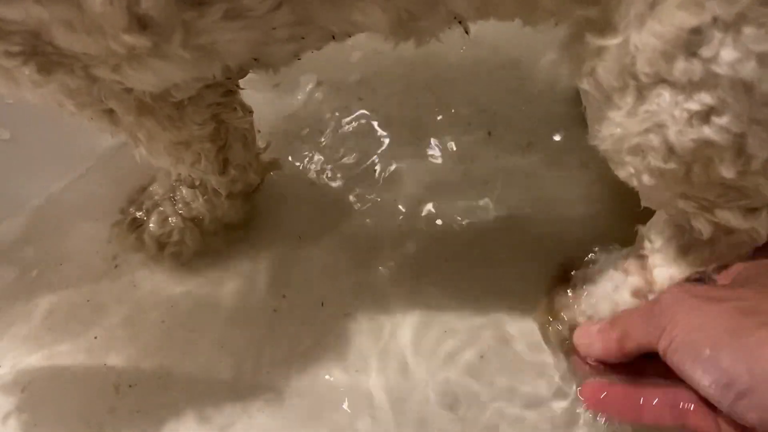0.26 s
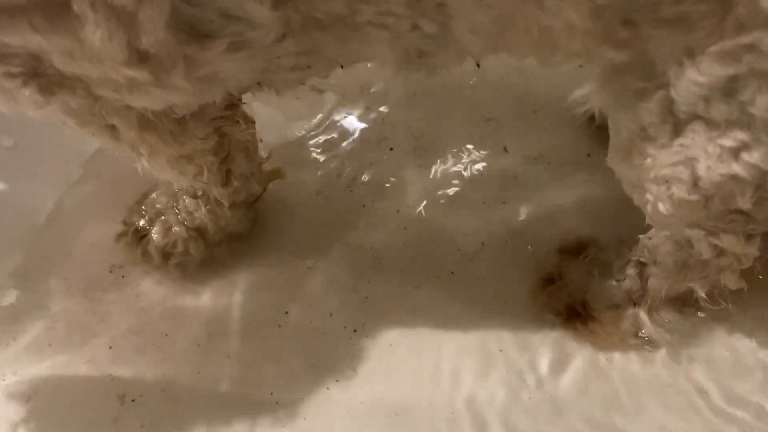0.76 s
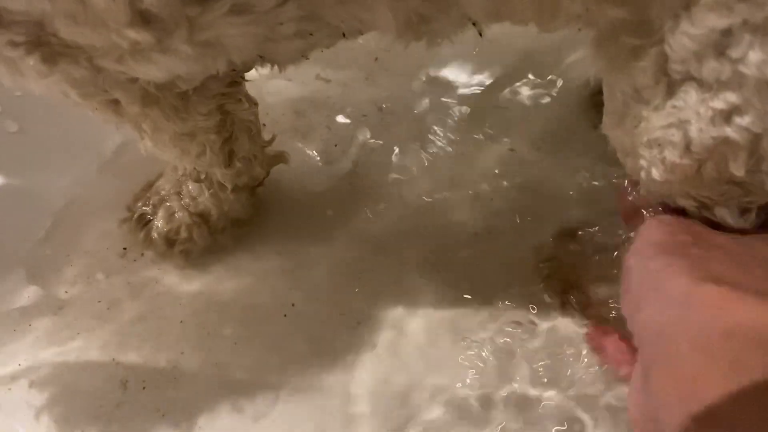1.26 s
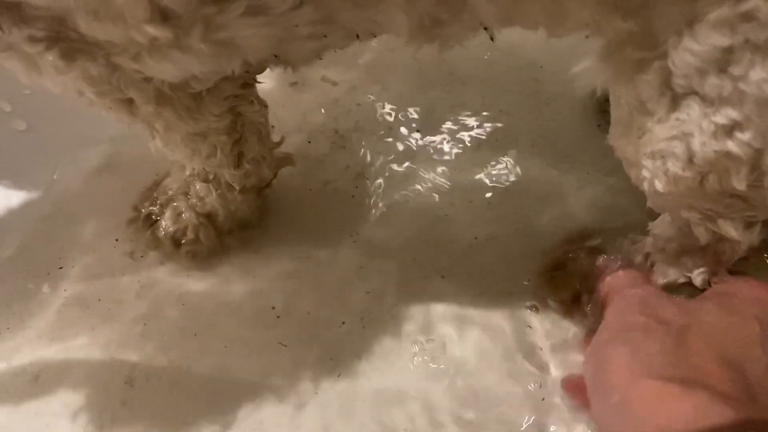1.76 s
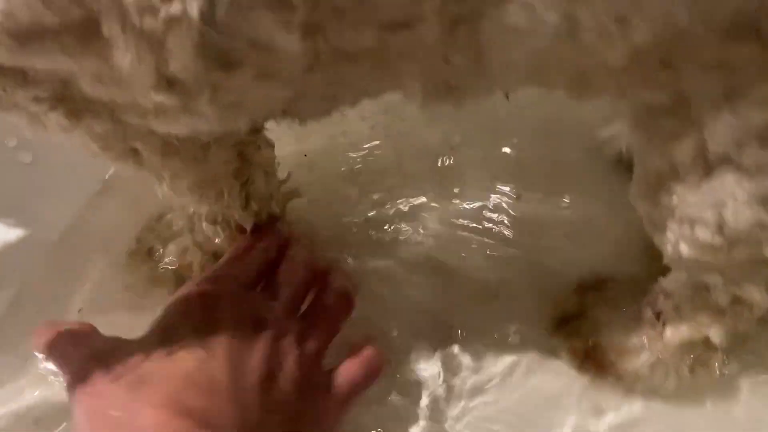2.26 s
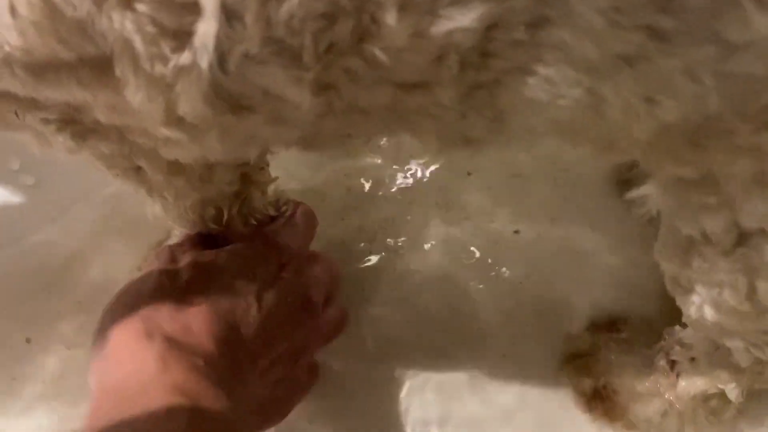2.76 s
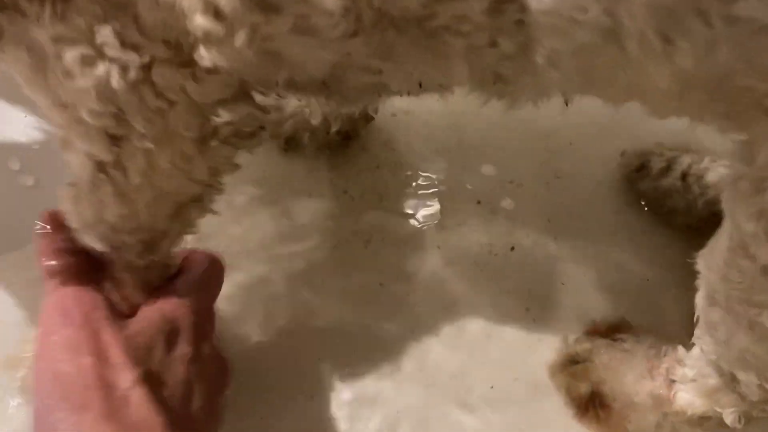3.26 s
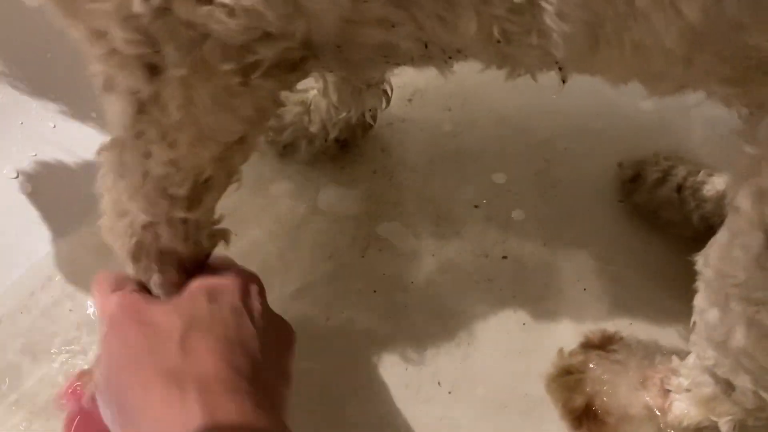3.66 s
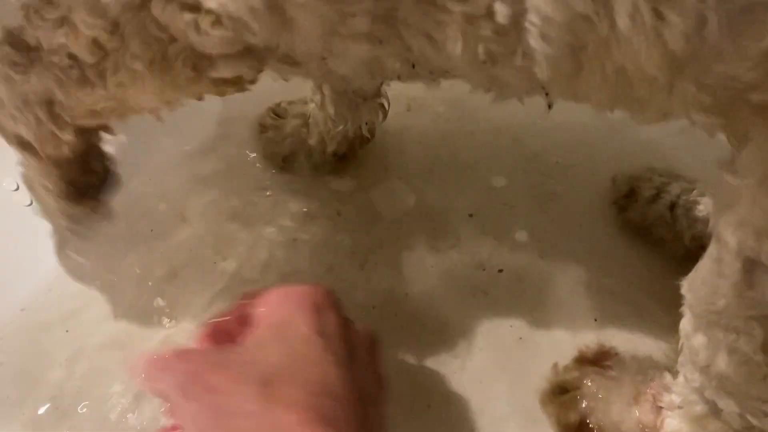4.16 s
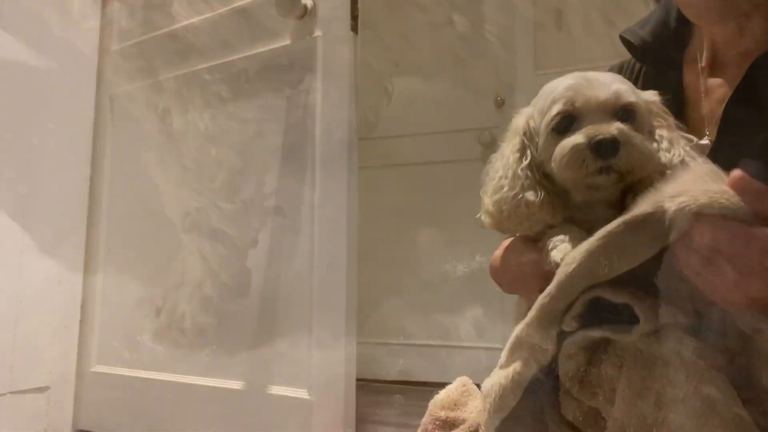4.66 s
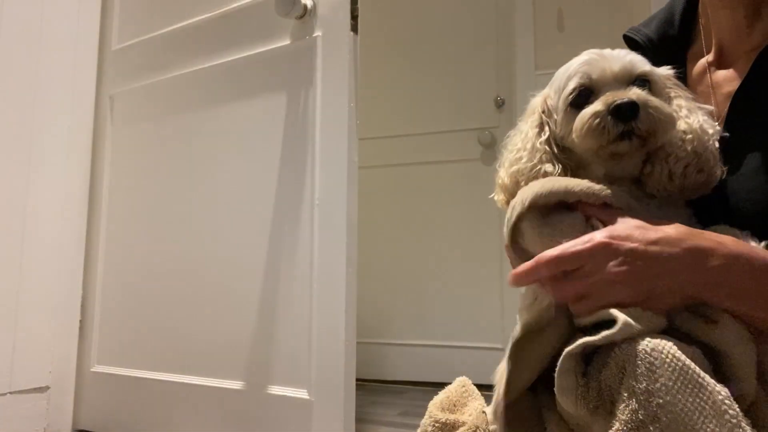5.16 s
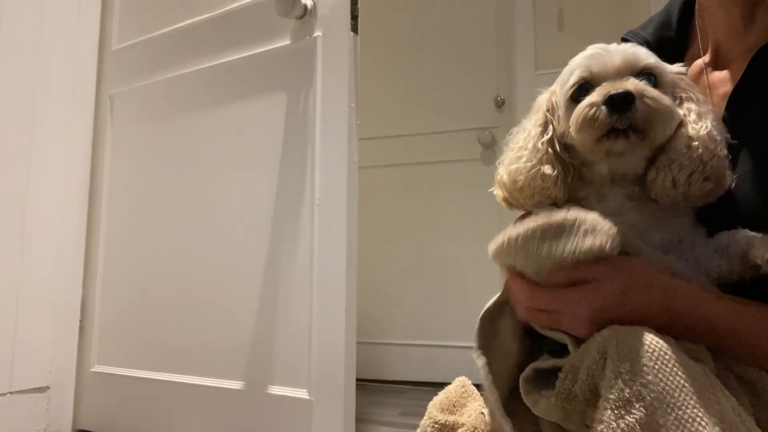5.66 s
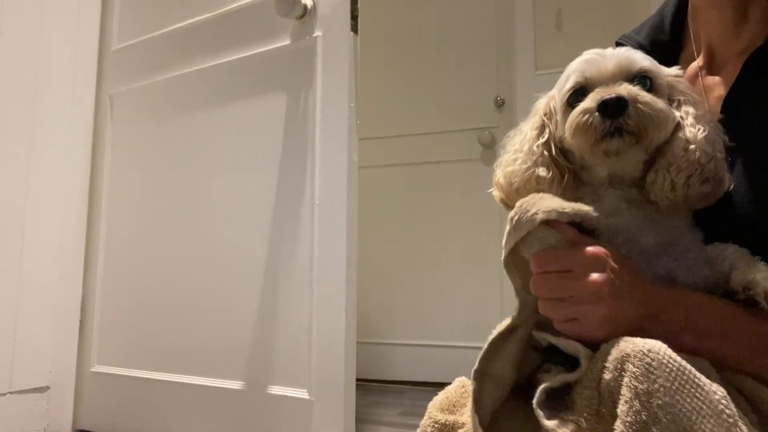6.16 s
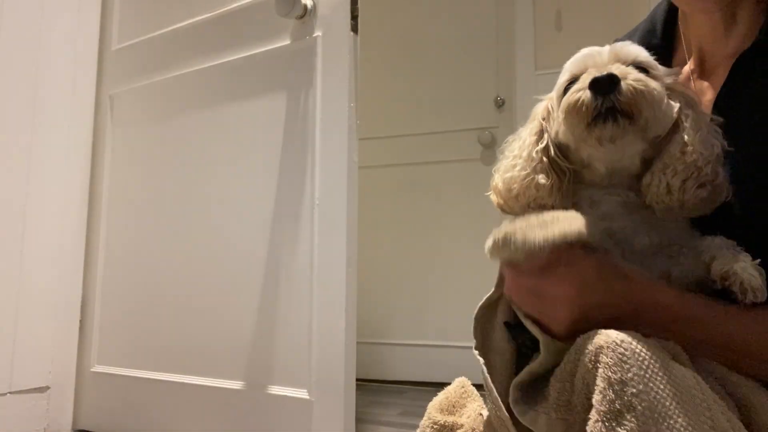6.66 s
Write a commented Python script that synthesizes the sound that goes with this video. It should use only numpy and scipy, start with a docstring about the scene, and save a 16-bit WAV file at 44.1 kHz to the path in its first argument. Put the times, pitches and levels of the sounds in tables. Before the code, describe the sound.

Close, hard-walled tub: a hand washes a small dog's paws in shallow water over a low fan hum. A few drips, then lively splashing with plopping bubbles, a quieter stretch of small trickles and soft wet-fur swishes, then a sharp, bubbly splash. The sound fades into a quieter room, with faint hiss and very soft towel strokes.

```python
"""Paw wash, then towel

A hand washes a small dog's paws in shallow bathwater: air pockets ring as gliding sines, drops tick as
noise bursts, stirred water mixes hiss with crowds of bubbles, and wet fur gives a smooth hiss. The hard tub
throws the water sounds back through a banded noise tail, knocks boom low, and a fan hums as shaped noise.
Then the scene dissolves to a quieter room with a steady faint room and microphone hiss, where strokes of
shaped noise are a towel rustling round the dog.
"""
import sys
import numpy as np
from scipy import signal
from scipy.fft import rfft, irfft, next_fast_len
from scipy.io import wavfile
from scipy.ndimage import uniform_filter1d

SR = 44100
rng = np.random.default_rng(int(sys.argv[2]) if len(sys.argv) > 2 else 0)


def wrap_up_sound(samples):
    """Save the sound to the file named by the first command line argument, as 16-bit audio."""
    columns = np.atleast_2d(samples).T
    # keep every value between -1 and 1, then stretch to whole-number steps
    tamed = np.clip(columns, -1, 1)
    steps = np.round(tamed * 32767).astype(np.int16)
    wavfile.write(sys.argv[1], SR, steps)


N = 305172

# Fan spectrum in each place: (frequency [Hz], density [dB per Hz])
FAN_AT_TUB = [(15, -37.5), (25, -22.5), (65, -2.5), (261, -10.5), (295, -9), (329, -22), (462, -25),
              (496, -11.5), (533, -16.5), (685, -16), (776, -26.5), (864, -18), (1120, -28), (1400, -47),
              (2340, -76.5), (3960, -120)]
FAN_IN_ROOM = [(15, -59), (25, -37.5), (81, 0.5), (207, -10.5), (295, -11), (329, -25.5), (422, -9.5),
               (462, -19.5), (543, -8), (626, -18), (723, -12.5), (1020, -26), (1400, -49), (2340, -64.5),
               (3960, -120)]
# Room modes that colour the fan: (frequency [Hz], width [Hz], lift [dB])
MODES_AT_TUB = [(37, 6.5, 4.5), (62.4, 10, 1.5), (129.5, 20, 8.5), (148.9, 9.8, -10.5), (170, 12, 9),
                (226, 9.7, 4), (297.66, 8.1, 20), (373.7, 57, 13), (420, 16, 13), (526.5, 3.7, 3.5),
                (700, 16, 4.5), (910, 7.9, -2.6)]
MODES_IN_ROOM = [(37, 8, 6.5), (80.9, 20, 2), (181, 16, 2.5), (292, 7.1, 4.7), (432, 11, 6.3),
                 (552, 8.9, 3.6), (685, 12, 16), (757, 11, 4.6), (856, 28, 6.3)]
# Likeness of the two microphone ports, limited when used: (frequency [Hz], likeness [0-1])
SAME_AT_TUB = [(60, 1.9), (250, 0.62), (420, 0), (700, 0.38), (1400, .5), (3000, 0), (6000, 0.04),
               (8500, 0.94), (16000, 0.7)]
SAME_IN_ROOM = [(60, .94), (150, 0.91), (330, 0.18), (650, 0.4), (1400, .2), (3000, 0.14), (6000, 0.19),
                (9000, 1), (16000, .97)]
# Phase by which the left port leads: (frequency [Hz], lead [radians])
LEAD_AT_TUB = [(400, 0), (520, -1), (690, -1.8), (950, -3), (1300, -5.2), (2000, -6.3), (7000, -5.8),
               (8800, -3.14), (11050, 0), (13400, 3.14), (15800, 6.2)]
LEAD_IN_ROOM = [(300, 0), (600, -1.7), (3450, 0), (6550, -.5), (9600, -3.14), (11200, -5.6), (15200, -9.42),
                (16600, -12)]
# Balance of the fan between the ports: (frequency [Hz], left over right [dB])
SIDE_AT_TUB = [(60, -3), (150, 2.5), (380, 1.5), (950, -1), (2380, 6), (5980, 0), (15000, 1)]
SIDE_IN_ROOM = [(60, -4), (150, 2), (380, -0.5), (950, -2), (2380, -4), (5980, 3), (15000, 0.0)]
# Decay time of the tub's tail: (frequency [Hz], time to fall 60 dB [s])
TUB_T60 = [(800, 0.25), (2500, 0.41), (7000, 0.08), (14000, 0.26)]
# Early echoes off the tub walls: (delay [ms], level over the tail's taps before decay [dB])
TUB_ECHOES = [(3.1, 8), (7.5, 11), (14, 14), (21, 7.5)]
# Tone at the microphone held over the tub: (frequency [Hz], level [dB])
TUB_COLOUR = [(7000, 0.5), (9000, 3.5), (11000, 1.5), (13000, -9.5), (14800, -14.5), (16000, -15.5)]
# Paws and hand knock the tub: (time [s], level [dB], pitch [Hz])
THUMPS = [(.02, -34, 63), (1.061, -34, 61), (1.699, -35, 64.5), (4.642, -32.5, 60.6), (4.645, -36, 180)]
# Tone of the room's steady faint hiss, shared by the light towel strokes:
# (frequency [Hz], density [dB per Hz])
RUSTLE = [(900, -27), (1400, -9), (2050, -10.5), (2500, -4.5), (3000, -12.5), (4100, -7), (5000, -1),
          (5800, -5), (8300, -8), (9500, -15), (11000, -42)]
# Towel strokes: (start [s], rise [s], hold [s], level [dB], fine top level [dB])
TOWEL = [(5.002, 0.017, .01, -69, -77), (5.253, 0.055, 0.12, -75, -80.5),
         (5.453, 0.026, 0.12, -72.5, -91.5), (5.607, 0.059, 0.037, -69.5, -83),
         (5.82, 0.07, 0.11, -76, -93.5), (5.949, 0.13, 0.021, -71.5, -78), (6.17, 0.0099, 0.093, -77, -85),
         (6.435, 0.052, 0.038, -60, -72.5), (6.577, 0.034, 0.046, -70.5, -76),
         (6.719, 0.041, 0.0037, -67.5, -90)]
# Tone of a firm rub: (frequency [Hz], density [dB per Hz])
STROKE = [(900, -12), (1500, -8), (2500, -1), (4000, -5), (6000, -2.5), (8300, -1.5), (9500, -10),
          (11000, -38)]
# The hand slides along wet fur: (start [s], rise [s], hold [s], level [dB], brightness [0-1])
SWISH = [(2.574, 0.024, .04, -59.5, .1), (2.637, 0.01, 0.014, -53.5, 0.36), (2.78, 0.13, 0.034, -59.5, 0),
         (2.995, 0.078, 0.039, -61, 0.55), (3.103, 0.0073, 0.0081, -60, 1), (3.28, 0.0086, 0.0079, -79, .9),
         (3.947, 0.096, 0.16, -67, 0)]
# Surges of stirred water:
# (start [s], rise [s], hold [s], body level [dB], spray level [dB], share that gurgles [0-1])
SLOSH = [(0, 0.01, 0.25, -71, -73.5, 0.2), (0.297, 0.028, 0.15, -78.5, -77, 0),
         (0.495, .03, 0.081, -72.5, -64.5, 0.2), (.625, 0.0075, 0.025, -54, -44, 0.75),
         (0.677, 0.013, 0.15, -42, -61, 0.28), (0.879, 0.0057, 0.01, -45, -40.5, 0.4),
         (0.911, 0.019, 0.12, -43.5, -55.5, 0.71), (1.124, 0.011, 0.06, -60, -60, .5),
         (1.185, 0.0092, 0.023, -53, -46.5, .1), (1.326, 0.011, 0.078, -82, -65, 0.4),
         (1.42, 0.02, 0.44, -80, -68.5, 0.18), (1.727, .008, .04, -90, -70, 0.08),
         (1.922, 0.089, 0.078, -60.5, -67.5, 0.44), (2.128, .01, .01, -62, -64, .2),
         (2.186, 0.061, 0.26, -73, -78, 0.4), (3.276, 0.036, 0.18, -85, -78, 0.43),
         (3.555, 0.0097, .01, -70, -63, .6), (3.577, 0.031, 0.016, -54.5, -72, 0.05),
         (3.681, .008, 0.0081, -61, -66, 0.3), (3.807, 0.02, 0.049, -82, -73, 0.6),
         (3.904, .008, 0.0074, -69, -71.5, 0.5), (3.943, .03, 0.026, -68, -90, 0.45),
         (4.315, 0.022, 0.038, -68, -60, .6), (4.365, 0.03, .01, -49.5, -65, 0.4),
         (4.43, 0.0039, 0.013, -33.5, -45.5, 0.06), (4.538, 0.05, 0.033, -47, -43, 0.9),
         (4.595, 0.0042, .04, -40, -41, 0), (4.647, 0.019, 0.092, -40.5, -45, 0.5),
         (4.777, 0.012, 0.17, -52, -57.5, 0.5)]
# Tone of the water's body and of its spray: (frequency [Hz], density [dB per Hz])
BODY = [(240, -30), (400, -1), (467, -13), (646, -8), (1830, -5.5), (3180, -12.5), (4280, -17),
        (7000, -15.5), (9100, -49), (15400, -120)]
SPRAY = [(2500, -14), (4500, 0), (7000, -5), (10000, -6.5), (16000, -5)]
# Drops, bursting films and small snaps: (time [s], level [dB], dull body against the treble [dB])
TICKS = [(0.0364, -33.5, -10), (0.1025, -48, -10), (.111, -44.5, 1), (.2435, -55, 8), (0.2622, -45, -34),
         (.405, -56, -24), (.5462, -53, -20), (0.567, -50, -11), (.586, -45.5, -16), (0.5914, -47, -15),
         (0.6346, -32, -21), (0.6656, -25, 6), (0.6935, -32, -7), (.7183, -30, -2), (0.734, -24, -4),
         (0.752, -20.5, 11), (0.782, -30, -11), (0.8466, -19, 13), (.8637, -19.5, 16), (.8865, -40, -15),
         (.9297, -31, 5), (1.02, -33, 0), (1.0616, -38, -11), (1.124, -29, 1), (1.0414, -47, 5),
         (1.1578, -47, -13), (1.2014, -22.5, -20), (1.304, -41.5, -8), (1.3432, -34, -3.5),
         (1.3728, -50.5, -24), (1.565, -54, -4.5), (1.612, -49.5, -1), (1.6483, -50, -14),
         (1.7307, -45, -20), (1.7506, -43, -15), (1.8766, -50, -22), (1.9485, -53, -9), (2.0009, -62, 2),
         (2.124, -40.5, 8), (2.248, -50, -14), (2.3096, -54, -16), (2.3434, -56, -25), (2.433, -49, -12),
         (2.565, -55, -11), (2.589, -53, -8), (2.6377, -34.5, 24), (2.6632, -43, 9), (3.1163, -46.5, 1),
         (3.565, -39, -8.5), (3.6003, -44, 3), (3.689, -44, 23), (3.7058, -42.5, -9), (3.811, -48.5, -13),
         (3.8347, -55, -23), (4.086, -43, 0), (4.279, -59.5, -12), (4.329, -33, -10), (4.369, -38, 4),
         (4.3936, -30, 3), (4.438, -28.5, -3), (4.5253, -44, -9), (4.5506, -45, -6), (4.569, -34, -3),
         (4.5818, -27, 16), (4.6033, -11.5, 3), (4.723, -28.5, -9), (4.774, -38, -1), (4.795, -32, 12),
         (4.818, -37, 5), (4.8324, -27.5, -4), (4.9507, -47, 0), (4.9654, -32, 6), (5.022, -45, -1),
         (5.0488, -52, -6.5), (5.692, -54, -6.5), (6.185, -59, -11), (6.446, -56, -0.5),
         (6.4867, -51.5, -17), (6.5084, -57, -9.5), (6.765, -59, -4.5)]
# Bubbles that stand out, and a few soft plops in the towel:
# (time [s], level [dB], pitch [Hz], length [ms], rise [octaves], left over right [dB])
BUBBLES = [(0.038, -40.5, 1636, 4.1, -0.0043, 2), (.635, -40, 1464, 12, -.19, 5),
           (.655, -31.5, 1820, 3.6, 0.094, -1.5), (.666, -25.5, 1750, 3.3, -0.22, 0),
           (0.671, -28.5, 5130, 0.86, 0.095, -12), (.68, -35, 1195, 7.9, 0.27, -0.5),
           (.696, -44.5, 2190, 9.4, -.09, -3.5), (.696, -33, 662, 18, 0.28, 3.5),
           (0.697, -30.5, 1434, 14, 0.16, 0), (0.72, -26.5, 5020, 2, 0, -9.5),
           (0.735, -31.5, 2910, 5.4, -0.004, 4), (0.749, -30, 2430, 8.3, 0.032, 6),
           (.765, -26.5, 2830, 3.3, 0.022, 7.5), (.77, -36, 566, 8.7, .36, 3),
           (.778, -30, 2050, 3.7, .06, -5.5), (0.778, -25.5, 987, 9.9, 0.59, 3),
           (.786, -30, 635, 6.8, 0.28, 2), (0.797, -30.5, 1034, 15.4, 0.13, 8.5),
           (.811, -31, 1790, 3.4, .29, -9), (.821, -25.5, 1750, 4.9, 0.19, 2.5),
           (0.837, -35, 3320, 6.5, 0.021, 3), (.847, -35.5, 1800, 3.2, -0.15, 1),
           (.849, -32, 3470, 0.42, 0, -11.5), (.865, -20.5, 1825, 2.8, -0.19, 5.5),
           (0.876, -36, 2740, 10, 0.16, -1.5), (0.886, -43, 1720, 8.1, -0.26, 1.5),
           (.95, -37, 819, 27, 0.94, 0.5), (.95, -42.5, 2230, 12, .1, 14),
           (.986, -37, 795, 2.2, -.14, -1.5), (.988, -38.5, 4800, 2.7, -0.49, -12),
           (1.014, -32.5, 4330, 2.6, 0.034, -5), (1.025, -39.5, 754, 8.7, -0.47, 0.5),
           (1.044, -44, 2790, 5, .1, -5), (1.046, -44, 1760, 10, 0, 5),
           (1.09, -38.5, 1272, 15.5, -0.026, 2.5), (1.113, -44, 3970, 2.4, 0, 0),
           (1.128, -32, 1780, 2.7, 0.35, 1), (1.161, -38, 5000, 1.4, 0, -4),
           (1.204, -40.5, 1170, 6.7, -0.1, 7), (1.343, -48.5, 1770, 3.9, 0.4, 4),
           (1.377, -43.5, 4970, 0.78, -0.18, -11), (1.628, -55, 3600, 4.6, 0.16, 0),
           (1.789, -51, 3650, 4.4, 0.11, -5), (1.842, -41, 3600, 3.2, 0.13, -5),
           (1.953, -59, 3020, 6, .05, -3), (1.987, -47, 1670, 1.5, .24, 2),
           (2.018, -44, 1330, 6.9, 0.14, 2), (2.031, -38, 2080, 4.1, 0.22, 5),
           (2.072, -51, 2490, 7.4, 0.11, -5), (2.123, -52, 2830, 2.1, -0.077, -1),
           (2.144, -39, 2125, 4.5, -0.051, 4), (2.39, -54, 2200, 2, 0, 3), (2.599, -45, 2090, 2.3, .06, 3),
           (2.88, -50, 2630, 2.5, .05, 2), (2.945, -50, 2600, 2.2, 0, 0), (3.175, -54, 2300, 2.7, 0, -1),
           (3.342, -64, 2400, 2, 0, -1), (3.45, -66, 2610, 1.8, 0, 0), (3.485, -65, 2500, 2, -0.12, 2),
           (3.579, -47, 1250, 5.7, -0.45, 3), (3.621, -48, 1290, 10.7, -0.21, 3),
           (3.623, -43, 2070, 4.2, 0.018, 7), (3.63, -45, 2060, 6, -0.19, -2),
           (3.645, -48.5, 3300, 7.1, 0.23, 6), (3.646, -40, 2180, 1.6, 0, 1),
           (3.69, -46, 1560, 5.7, -0.029, 3), (3.723, -51.5, 3900, 2.5, -.11, -1),
           (3.922, -36.5, 2990, 3.5, 0, 5), (3.933, -57.5, 3250, 25, 0, 1), (3.982, -53, 3900, 3.5, 0, 3),
           (3.983, -52.5, 2070, 3, 0, 4), (4.252, -58, 3200, 2.5, 0, 2), (4.371, -41.5, 4160, 3, .05, -3.5),
           (4.397, -40, 1530, 21, -.12, 2.5), (4.411, -28.5, 2600, 3.7, .36, 2.5),
           (4.438, -29, 2380, 3, -.1, 4.5), (4.442, -25, 774, 15.2, 0.26, -8),
           (4.452, -28, 1174, 12.3, 0.064, -4), (4.465, -27, 1550, 2.1, 0.3, 0.5),
           (4.474, -21.5, 1537, 9.1, -0.035, 3), (4.486, -34, 2104, 10, 0.59, -1),
           (4.513, -25.4, 1720, 3.2, -0.0068, -4.5), (4.57, -33.5, 4070, 1.6, 0.24, 1.5),
           (4.585, -39.5, 3560, 6, 0, 4), (4.59, -39, 2800, 11, 0.035, 0.5),
           (4.592, -33.5, 2200, 2.8, 0.18, -4), (4.6, -37, 1452, 20, 0.042, 6),
           (4.604, -22, 4250, 3.4, 0.1, -2.5), (4.607, -30.5, 2810, 3, -0.079, 1.5),
           (4.616, -31, 2750, 11.3, -0.39, 4.5), (4.619, -34, 1400, 10.7, -0.18, -1),
           (4.625, -32, 2340, 3.2, -0.21, 7), (4.646, -40, 4900, 2.5, .05, -0.5),
           (4.657, -36, 1640, 7.6, -.31, -14), (4.695, -39.5, 1890, 4.3, 0.41, 1.5),
           (4.709, -40.5, 1270, 5.5, -0.39, -5.5), (4.712, -38.5, 564, 21, -0.18, -5.5),
           (4.72, -34.5, 2010, 3.4, .13, 4), (4.723, -28.5, 5167, 1.4, 0.0082, -4),
           (4.73, -30.5, 1970, 4.9, 0.25, 0.5), (4.734, -23, 1220, 8, -0.072, -4),
           (4.738, -30.5, 794, 8, .1, -9), (4.742, -30.5, 1936, 8.7, 0.26, -0.5),
           (4.753, -30, 810, 5.2, -0.39, 3), (4.803, -38, 2520, 12.6, 0.0078, 1),
           (4.804, -33.5, 997, 29, -0.23, 8.5), (4.805, -44.5, 525, 14, 0, 0),
           (4.846, -37.5, 2627, 5.7, 0.48, 0), (4.877, -19, 903, 3.7, -0.023, 2.5),
           (4.885, -43, 1730, 12, .3, 3), (4.916, -37, 754, 17.4, 0.53, 9.5),
           (4.945, -40, 1000, 6.9, -0.12, 3), (4.965, -30, 3670, 1.33, 0.056, -6.5),
           (6.52, -53, 1410, 2.6, 0.46, -4), (6.537, -52, 1300, 2.5, -0.018, -3)]

DISSOLVE = 4.4, 5.05  # start and end, s
FAN_DB = -46, -49.5  # at the tub, in the room
STILL_DB = -79, -87.5  # steady faint room and microphone hiss: its body, its top
TICK_RISE_MS, TICK_PAN_DB = 1.72, -0.5
BODY_FALL, SPRAY_FALL, TOWEL_FALL, SWISH_FALL = 229, 220, 205, 120  # dB per s
ONSET_DB = -15  # a stroke rises from this far below its level
EDGE_HZ = 16200  # top of the recorded band


def gain_of(db):
    """Turns dB into gain."""
    return 10 ** (np.asarray(db) / 20)


def evened(x):
    """Scales to rms 1."""
    return x / np.sqrt(np.mean(x ** 2) + 1e-20)


def read(points, hz):
    """Reads a table on a log-frequency axis."""
    f, value = np.transpose(points)
    return np.interp(np.log(hz + 1), np.log(f + 1), value)


def add(mix, s, left, right, pan_db):
    """Drops one event into both channels, panned by level."""
    at = round(s * SR)
    part = mix[:, at:at + len(left)]
    panned = np.array([left, right]) * gain_of([[pan_db / 2], [-pan_db / 2]])
    part += panned[:, :part.shape[1]]


def follow(rows, db, share, fall):
    """Strokes rise, hold and die away; each one's share splits its power between two layers."""
    power, t = np.zeros((2, N)), np.arange(SR * 3 // 4) / SR
    for (s, rise, hold, *_), level_db, part in zip(rows, db, np.clip(share, 0, 1)):
        rise_db = ONSET_DB * (1 - t / max(rise, .002)).clip(0)
        fall_db = fall * (t - rise - hold).clip(0)
        shape = gain_of(level_db + rise_db - fall_db) ** 2
        add(power, s, (1 - part) * shape, part * shape, 0)
    return np.sqrt(power)


def noise(colour_db, same, size, patchy_db, flicker_db, pan_db=0):
    """Random short-time spectra with drifting patches and a flicker common to all bins; rms 1."""
    frames, bins = 4 * N // size + 5, size // 2 + 1
    a, b, c, d, patches = rng.standard_normal((frames, bins, 5)).T
    patches = uniform_filter1d(patches, size=5, axis=0)  # smooth over frequency
    patches = evened(uniform_filter1d(patches, size=10, axis=1))  # smooth over time
    flicker = evened(uniform_filter1d(rng.standard_normal(frames), size=3))
    same = np.clip(same, -.97, .97)[:, None]
    left, other = a + 1j * b, c + 1j * d
    z = np.array([left, same * left + np.sqrt(1 - same ** 2) * other])
    z *= gain_of(colour_db[:, None] + patchy_db * patches + flicker_db * flicker)
    z *= gain_of(np.outer([.5, -.5], pan_db))[..., None]
    return evened(signal.istft(z, nperseg=size, noverlap=size * 3 // 4)[1][:, :N])


def fan(colour, modes, same, side, db):
    """Low, steady fan noise lifted or dipped at the room's modes."""
    hz = np.fft.rfftfreq(4096, 1 / SR)
    lift_db = sum(d / (1 + (2 * (hz - f) / w) ** 2) for f, w, d in modes)
    hum = noise(read(colour, hz) + lift_db, read(same, hz), size=4096,
                patchy_db=.3, flicker_db=.2, pan_db=read(side, hz))
    return gain_of(db) * hum


def tub(x):
    """A few early echoes off the walls and a sparse tail whose bands die at their own speed."""
    taps = np.zeros((2, SR // 2))
    at = np.arange(300, SR // 2 - 20, 20)
    at = at + rng.integers(0, 20, (2, len(at)))  # one tap per 20 samples, jittered
    np.put_along_axis(taps, at, rng.choice([-1., 1.], at.shape), 1)
    for ms, db in TUB_ECHOES:
        delays = np.round(ms * SR / 1000 * np.array([1, 1.08])).astype(int)  # right a little later
        taps[[0, 1], delays] += gain_of(db)
    hz, t, z = signal.stft(taps, SR, nperseg=256)
    same = np.clip(read(SAME_AT_TUB, hz), 0, 1)[:, None]
    z[1] = same * z[0] + np.sqrt(1 - same ** 2) * z[1]
    decay = gain_of(-60 * t / read(TUB_T60, hz)[:, None])
    tail = signal.istft(z * decay, SR, nperseg=256)[1]
    return signal.fftconvolve(x, gain_of(-8) * tail / np.linalg.norm(tail[0]), axes=1)[:, :N]


def thumps():
    """A knock makes the tub shell boom briefly: a low sine under a swell and decay."""
    out, t = np.zeros((2, N)), np.arange(8000) / SR
    for s, db, hz in THUMPS:
        swell = (t / 0.037 * np.exp(1 - t / 0.021)) ** 1.2
        boom = gain_of(db) * swell * np.sin(2 * np.pi * hz * t)
        add(out, max(s - .02, 0), boom, boom, 0)
    return out


def towel_over_room_hiss():
    """Terry cloth on fur: scratchy strokes with a finer top, over the steady room and microphone hiss."""
    hz = np.fft.rfftfreq(512, 1 / SR)
    *_, db, top_db = np.transpose(TOWEL)
    gate = np.interp(np.arange(N) / SR, (4.98, 5.04), (0, 1))
    same = read(SAME_IN_ROOM, hz)
    still = noise(read(RUSTLE, hz), same, size=512, patchy_db=3.0, flicker_db=1.3)
    rub = noise(read(STROKE, hz), same, size=512, patchy_db=3.5, flicker_db=2.5)
    top_colour = -30 * np.log2((hz + 1) / 12200) ** 2
    top = noise(top_colour, same, size=512, patchy_db=5.0, flicker_db=-3.0)
    firmness = np.interp(db, (-72, -62), (0, 1))  # light strokes share the colour of the room hiss
    light, firm = follow(TOWEL, db, firmness, TOWEL_FALL)
    fine = follow(TOWEL, top_db, 0 * db, TOWEL_FALL)[0]
    # light strokes use the hiss reversed in time
    body = firm * rub + light * still[:, ::-1] + gain_of(STILL_DB[0]) * still
    return gate * (body + np.hypot(fine, gain_of(STILL_DB[1])) * top)


def swish():
    """A hand along wet fur: a smooth hiss blended from a dull and a bright colour."""
    *_, db, brightness = np.transpose(SWISH)
    hz = np.fft.rfftfreq(512, 1 / SR) + 1
    soft, sharp = follow(SWISH, db, brightness, SWISH_FALL)

    def hump(centre_hz, steep_db):
        """Hiss that falls away on both sides of its centre, steeper with each octave."""
        colour = -steep_db * np.log2(hz / centre_hz) ** 2
        return noise(colour, read(SAME_AT_TUB, hz), size=512, patchy_db=1.5, flicker_db=1.0)

    return soft * hump(2200, 3.9) + sharp * hump(3900, 6.9)


def bubble(hz, ms, rise):
    """An air pocket swells in and rings out while its pitch glides up or down."""
    u = (np.arange(round(3 * ms * SR / 1000) + 40) / SR * 1000 - .5).clip(0) / ms  # time in lengths
    turns = hz * ms / 1000 * (u + np.log(2) * rise * (u / 2 - .45) * u)
    return (u / 0.49 * np.exp(1 - u / 0.46)) ** 2.0 * np.sin(2 * np.pi * turns)


def gurgle(lo_hz, hi_hz, per_s, spread_db, cycles, colour):
    """A crowd of small bubbles: 24 pitches, each struck at random times and loudnesses; rms 1."""
    out = np.zeros((2, N))
    for hz in np.geomspace(lo_hz, hi_hz, num=24):
        train, count = np.zeros((2, N)), round(per_s / 48 * N / SR)  # 24 pitches in 2 channels
        sizes = gain_of(spread_db * np.minimum(rng.exponential(1, (2, count)), 4))
        np.put_along_axis(train, rng.integers(0, N, (2, count)), sizes, 1)
        same = np.clip(read(SAME_AT_TUB, hz), 0, 1)
        train[1] = same * train[0] + np.sqrt(1 - same ** 2) * train[1]
        shape = bubble(hz, 1000 * cycles * rng.uniform(0.59, 1.3) / hz, rng.uniform(0, 0.47))
        out += signal.oaconvolve(train, (gain_of(read(colour, hz)) * hz * shape)[None])[:, :N]
    return evened(out)


def slosh():
    """Stirred water: a body and a finer spray, each partly hiss and partly separate bubbles."""
    *_, body_db, spray_db, share = np.transpose(SLOSH)
    hiss, gurgling = follow(SLOSH, body_db, share, BODY_FALL)
    mist, fizz = follow(SLOSH, spray_db, share, SPRAY_FALL)
    hz = np.fft.rfftfreq(256, 1 / SR)
    same = read(SAME_AT_TUB, hz)
    body = hiss * noise(read(BODY, hz), same, size=256, patchy_db=8.0, flicker_db=3.5)
    body += gurgling * gurgle(550, 5500, per_s=2200, spread_db=4.5, cycles=10, colour=BODY)
    spray_colour = read(SPRAY, hz) - 40 * (hz < 2500)  # keep the spray out of the lows
    spray = mist * noise(spray_colour, same, size=256, patchy_db=5.5, flicker_db=4.0)
    spray += fizz * gurgle(4000, 15000, per_s=1500, spread_db=6.0, cycles=3.5, colour=SPRAY)
    return body + spray


def ticks():
    """Each drop is a short bright noise burst with a duller body."""
    out, t = np.zeros((2, N)), np.arange(400) / SR * 1000  # t in ms
    bright = signal.butter(2, 5000, "high", fs=SR)
    dull = signal.butter(2, [1500, 4500], "band", fs=SR)
    swell = (t / TICK_RISE_MS * np.exp(1 - t / TICK_RISE_MS)) ** 2.8
    for (s, db, body_db), burst in zip(TICKS, rng.standard_normal((len(TICKS), 3, 400))):
        burst = burst * swell
        treble = signal.lfilter(*bright, burst[[0, 0]])  # same in both channels
        body = signal.lfilter(*dull, burst[1:] + 0.42 * burst[0])  # partly its own in each channel
        drop = treble + gain_of(body_db) * body
        add(out, s - .0007, *(gain_of(db) * drop / abs(drop).max()), TICK_PAN_DB)
    return out


def bubbles():
    """The ringing air pockets that stand out, placed one by one."""
    out = np.zeros((2, N))
    for s, db, hz, ms, rise, pan_db in BUBBLES:
        ring = gain_of(db) * bubble(hz, ms, rise)
        add(out, s - .0005 - .15 * ms / 1000, ring, ring, pan_db)  # early, to allow for the swell
    return out


def ports(x, lead):
    """The left port hears each frequency with its own phase lead."""
    f, radians = np.transpose(lead)
    size = next_fast_len(N + 4096)
    turn = np.exp(1j * np.interp(np.fft.rfftfreq(size, 1 / SR), f, radians))
    left = irfft(rfft(x[0], size) * turn, size)[:N]
    return np.array([left, x[1]])


def scene():
    """The water in its tub, and the two rooms dissolving into each other."""
    room = np.interp(np.arange(N) / SR, DISSOLVE, [0, 1])
    near, water = bubbles(), ticks() + slosh() + swish()
    hz = np.linspace(0, SR / 2, 257)
    colour = signal.firwin2(255, hz, gain_of(read(TUB_COLOUR, hz)), fs=SR)[None]
    water = signal.oaconvolve(water + tub(water + near), colour, "same")
    tub_fan = fan(FAN_AT_TUB, MODES_AT_TUB, SAME_AT_TUB, SIDE_AT_TUB, FAN_DB[0])
    room_fan = fan(FAN_IN_ROOM, MODES_IN_ROOM, SAME_IN_ROOM, SIDE_IN_ROOM, FAN_DB[1])
    at_tub = near + water + thumps() + np.sqrt(1 - room) * tub_fan
    in_room = room * room_fan + towel_over_room_hiss()
    return ports(at_tub, LEAD_AT_TUB) + ports(in_room, LEAD_IN_ROOM)


def record(dry):
    """The microphone drops the deepest bass; then a steep low-pass limits the band."""
    cut = signal.sosfilt(signal.butter(4, 29, "high", fs=SR, output="sos"), dry)
    band = signal.firwin(511, EDGE_HZ, window=("kaiser", 9), fs=SR)[None]
    return signal.oaconvolve(cut, band, "same")


dry = scene()
out = record(dry)
wrap_up_sound(out)
```